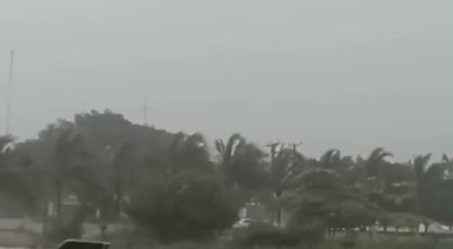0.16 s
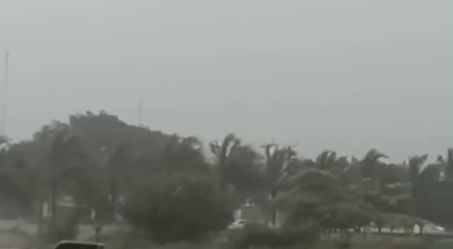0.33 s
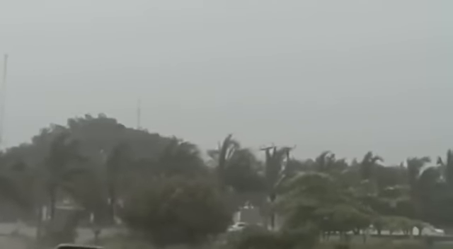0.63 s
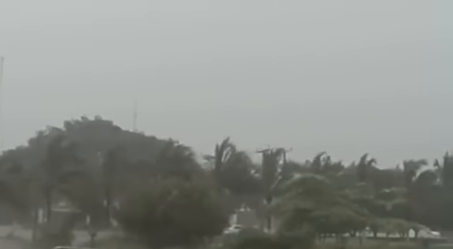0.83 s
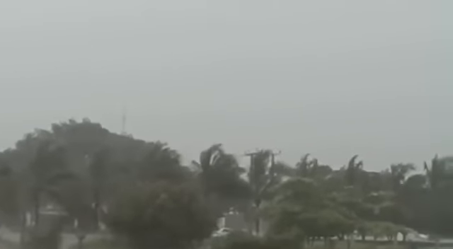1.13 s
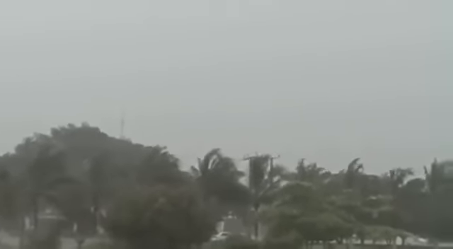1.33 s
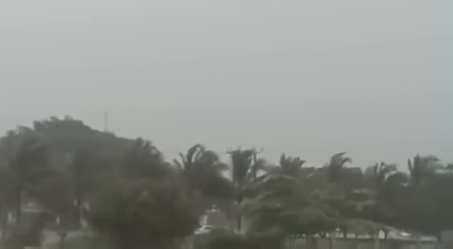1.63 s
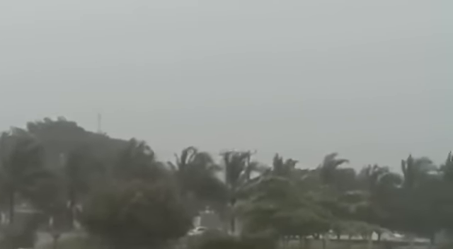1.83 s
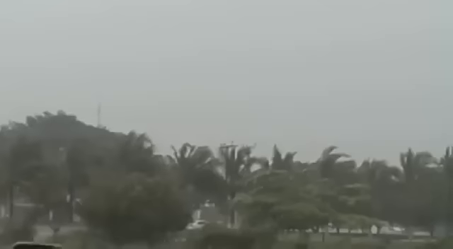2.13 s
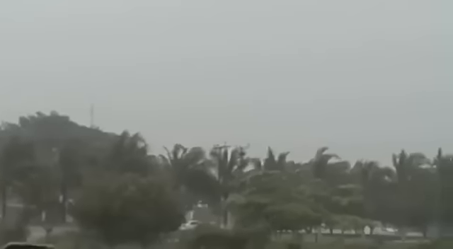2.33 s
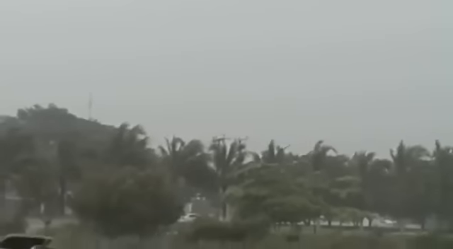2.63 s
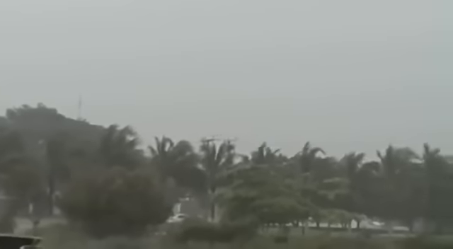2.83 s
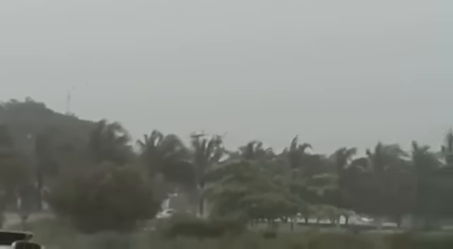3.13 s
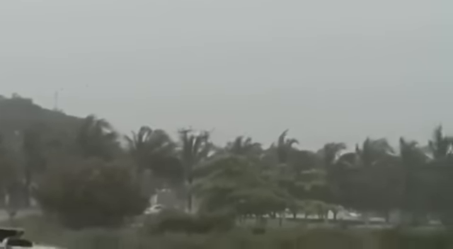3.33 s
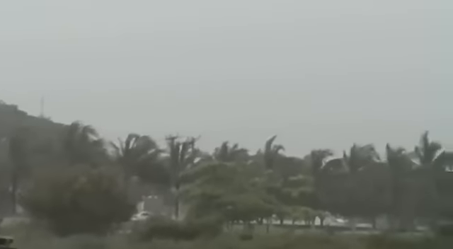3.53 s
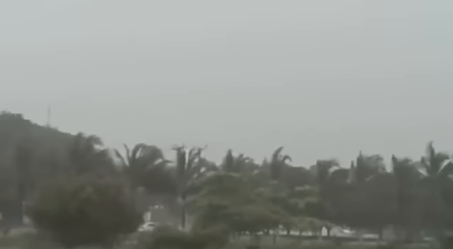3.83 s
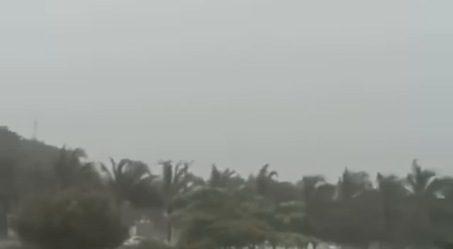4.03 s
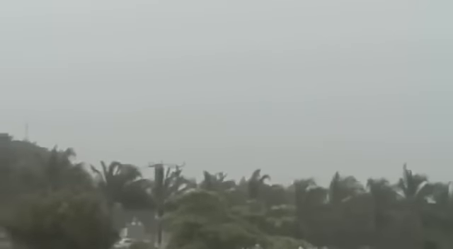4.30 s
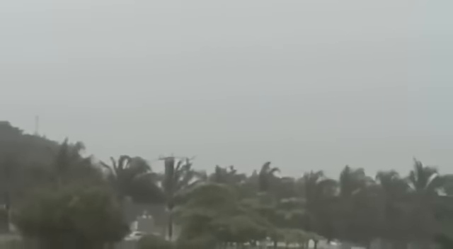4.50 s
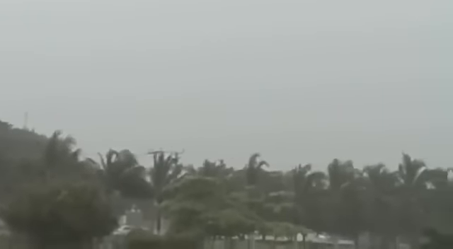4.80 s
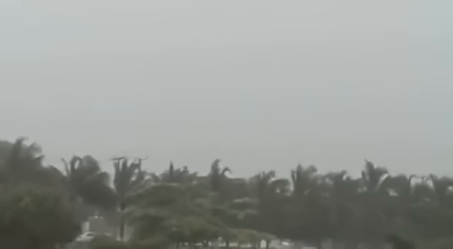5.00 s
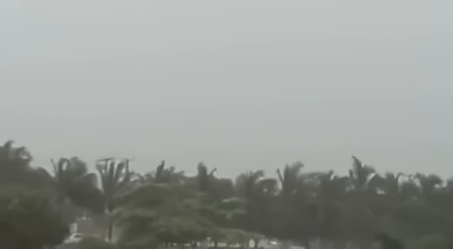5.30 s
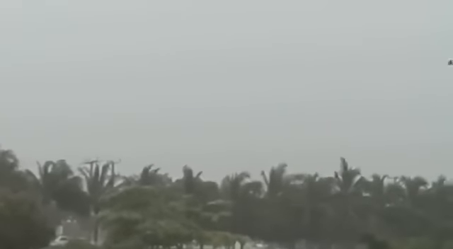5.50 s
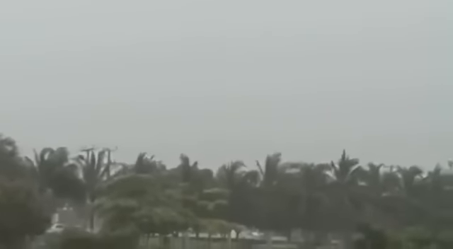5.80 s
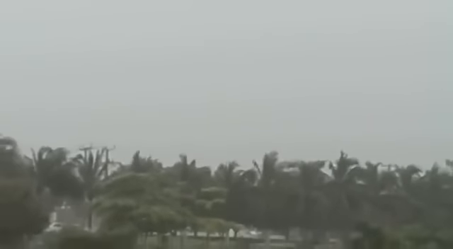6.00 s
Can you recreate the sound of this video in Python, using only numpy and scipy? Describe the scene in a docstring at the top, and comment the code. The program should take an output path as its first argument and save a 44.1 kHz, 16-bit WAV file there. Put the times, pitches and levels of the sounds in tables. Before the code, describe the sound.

Violent storm wind thumps and batters a hand-held microphone in uneven gusts, over the steady roar of thrashing palms and hissing heavy rain.

```python
"""Gusts of a hurricane buffet the two microphone ports of a hand-held camera: noise played louder and
faster as the pressure rises, with swings of pressure for thumps and slaps, and bursts of torn flow.
Behind them a line of palms roars and rain hisses: noise shaped in time and frequency at each port.
Tiny ticks make the nearer drops, one band of noise a flick of spray; the loudest peaks round off."""
import sys
import numpy as np
from scipy import signal
from scipy.fft import rfft, irfft
from scipy.io import wavfile
from scipy.ndimage import uniform_filter1d

SR = 44100
rng = np.random.default_rng(int(sys.argv[2]) if len(sys.argv) > 2 else 0)


def inscribe(sig):
    """Save sig as 16-bit PCM at rate SR to the path in sys.argv[1].

    A 1-D sig is mono; a 2-D sig holds one channel per row.
    Samples are clipped to [-1, 1] before scaling.
    """
    pcm = np.round(np.clip(np.atleast_2d(sig).T, -1, 1) * 32767)
    wavfile.write(sys.argv[1], SR, pcm.astype(np.int16))


N = 271215
TIME_S = np.arange(N) / SR
HZ = np.fft.rfftfreq(N, 1 / SR)

# roar of the trees, used about its mean: (time [s], level [dB])
ROAR = [(0.0, -26.5), (0.52, -24), (0.84, -26), (1.26, -24), (2.6, -25.5), (2.95, -27.5), (3.25, -25.5),
        (3.48, -25), (3.86, -23.5), (4.4, -26), (4.7, -24), (5.14, -24), (5.58, -26.5), (6.15, -24.5)]
# slow swell of the rain: (time [s], level [dB])
HISS = [(0.0, -28), (0.22, -25.5), (0.62, -25), (0.9, -27.5), (1.1, -26), (2.05, -26.5), (2.25, -27.4),
        (2.65, -26.5), (3.12, -27.5), (3.55, -26), (4.0, -24.8), (4.62, -25), (4.9, -24), (5.3, -24),
        (5.42, -25), (5.7, -26.8), (5.9, -26.5), (6.15, -25.5)]
# sheets of rain that swell out of the hiss: (time [s], rise [dB])
SHEETS = [(1.05, 0.5), (1.33, 2), (1.63, 2), (1.83, 1.5), (2.06, 1.5), (2.68, 0), (3.89, 3), (4.19, 0),
          (4.72, 1.5), (4.88, 1), (5.04, 1), (5.22, 0)]
# colour of trees and rain at each port: (frequency [Hz], relative density [dB])
LEFT_WASH = [(100, -6), (350, -17), (600, -8.5), (1170, -2), (1290, -5), (1830, -0.8), (2070, -1.7),
             (2510, -9.5), (3340, -6), (3680, -10.5), (5380, -5.5), (6730, -14), (6940, -17), (8950, -26),
             (10170, -24.5), (10840, -27.5), (14200, -33)]
RIGHT_WASH = [(100, -17), (350, -5), (600, -6), (1170, -2.5), (1330, -4), (1660, -4), (1950, -1.4),
              (2510, -9.5), (3450, -10.5), (3920, -11.5), (4310, -14.5), (5050, -13.5), (6110, -12),
              (6940, -14), (8950, -8), (9850, -8), (14200, -23)]
# narrow resonances of both ports: (frequency [Hz], width [Hz], rise [dB])
PORT_RINGS = [(1170, 57, 0.2), (3400, 160, 1.6), (4280, 63, 4)]
# likeness of the wash at the two ports: (frequency [Hz], correlation [-1..1])
LIKENESS = [(360, -0.8), (500, 0.06), (680, -0.26), (900, 0.29), (1400, 0.34), (1900, 0.08), (2500, -0.23),
            (3300, 0.18), (4500, -0.013)]
# strength of the wind around the camera: (time [s], level before trims [dB])
WIND = [(0.0, -23), (0.28, -29), (0.44, -20), (0.95, -21.5), (1.42, -31), (1.55, -21), (1.66, -23),
        (1.86, -21), (2.35, -30), (2.7, -26.5), (3.08, -25), (3.22, -19.5), (3.46, -24), (3.66, -20.5),
        (4.95, -19.5), (5.07, -24), (5.58, -19.5), (5.66, -31), (5.98, -38), (6.15, -27)]
# heaving air: (frequency [Hz], relative density [dB])
HEAVE_SPECTRUM = [(1, -20), (4, 4), (35, 1.5), (60, -5), (110, -25), (400, -50), (2000, -100)]
# small eddies in a moderate gust: (frequency [Hz], relative density [dB])
EDDY_SPECTRUM = [(15, -17), (55, -6.5), (105, 0), (240, -7), (440, -14), (800, -28), (1800, -47),
                 (6000, -85)]
# gusts that strike the ports: (start [s], length [s], windward pressure [dB], left-right [dB])
GUSTS = [(0.369, 0.07, -21, 0), (0.682, 0.18, -18.5, -2), (0.92, 0.025, -17, -1), (1.116, 0.037, -21, -2),
         (1.252, 0.055, -12, 10), (1.319, 0.17, -14.5, 9), (1.401, 0.04, -10, 12),
         (1.575, 0.017, -12.5, 14), (1.679, 0.03, -19, -9), (1.912, 0.023, -19, -8),
         (1.968, 0.018, -17, 10), (2.068, 0.022, -19, -7), (2.809, 0.046, -23, 2), (3.161, 0.034, -8.5, 18),
         (3.216, 0.16, -12.5, 12), (3.402, 0.054, -17, 8), (3.508, 0.021, -12, -15), (3.551, 0.089, -19, 2),
         (3.656, 0.2, -13.5, 12), (3.679, 0.0201, -5, 14), (3.73, 0.035, -9, 13.5), (3.829, 0.023, -10, 13),
         (3.924, 0.082, -15.5, 7.5), (4.06, 0.048, -17, 9), (4.216, 0.045, -12.5, 12.5),
         (4.276, 0.022, -8.5, 15), (4.324, 0.044, -20, 2), (4.415, 0.06, -11, 15), (4.58, 0.17, -19, -2),
         (4.82, 0.077, -17.5, 3), (4.94, 0.05, -15.5, 9), (5.165, 0.039, -18, 4.5),
         (5.434, 0.051, -18.5, 5), (5.518, 0.085, -19.5, 1), (6.094, 0.029, -19, 5.5)]
# large eddies landing as round thumps: (centre [s], peak before trim [dB], pitch [Hz])
THUMPS = [(0.413, -16, 79), (0.474, -12, 68), (0.735, -16, 78), (0.844, -11, 93), (0.942, -15.5, 95),
          (1.258, -11, 96), (1.304, -8, 130), (1.434, -6, 135), (1.548, -4.5, 54), (1.721, -15, 66.1),
          (1.883, -9, 104.4), (1.978, -10, 115), (2.08, -11, 120.2), (2.455, -17, 130), (3.168, -11, 118),
          (3.25, -2.5, 81), (3.35, -0.5, 103), (3.529, -11, 80.66), (3.59, -7, 92.86), (3.656, -7, 95),
          (3.732, 1, 126), (3.834, -10, 123), (3.93, -8, 82.7), (3.983, -11, 98), (4.019, -12, 90.66),
          (4.11, -11, 71), (4.213, -7, 81.13), (4.34, -7, 95.1), (4.412, -6, 82.93), (4.469, -6.5, 96.2),
          (4.699, -12, 68.02), (4.961, -5.5, 62), (5.173, -5.5, 97.35), (5.203, -18, 95.7),
          (5.386, -10, 66), (5.528, -8, 87.1), (5.587, -10.5, 82.73)]
# sharp eddies that slap a port: (time [s], peak before trim [dB], left-right [dB], only its sign is used)
SLAPS = [(0.692, -11, -1), (0.843, -23, -2), (0.94, -22, -2), (1.3, -17, 4), (1.437, -12, 5.0),
         (1.489, -21, 4), (2.455, -20, -1.0), (3.159, -16, 3), (3.221, -12, 7), (3.281, -9.5, 5.5),
         (3.295, -15, 4.5), (3.361, -9, 5.5), (3.58, -19, 3.0), (3.656, -8, 3.0), (3.728, -6, 6.0),
         (4.21, -17, 5.0), (4.289, -23, 3.5), (4.406, -11.5, 9), (4.464, -13, 4.0), (4.651, -10.5, -9),
         (5.172, -25, 2), (5.579, -14, 4.0)]
# torn flow on the left port: (centre [s], half length [s], level [dB], upper edge [Hz])
TEARS = [(0.936, 0.0073, -21, 450), (1.285, 0.025, -20, 420), (1.433, 0.022, -17, 524),
         (1.588, 0.0054, -15, 500), (3.188, 0.006, -23, 1600), (3.226, 0.0062, -18, 1400),
         (3.295, 0.02, -23, 900), (3.68, 0.025, -24, 1100), (3.749, 0.013, -10.3, 1600),
         (3.84, 0.028, -21, 1000), (4.284, 0.012, -12.5, 480), (4.43, 0.008, -18, 1198),
         (4.46, 0.016, -14, 540)]

WASH_DB, MODERATE_DB, EDGE_HZ = -22, -20, 14330
GUST_RISE_S, GUST_FALL_S, SHEET_S = 0.01208, 0.013, 0.019
# eddies between gusts: level in a moderate wind, gain in dB per dB of wind
BREEZE_DB, BREEZE_FOLLOW = -25.8, 0.31


def gain_of(db):
    """Decibels to an amplitude factor."""
    return 10 ** (np.asarray(db) / 20)


def evened(x):
    """Scales to rms 1."""
    return x / np.sqrt(np.mean(x ** 2) + 1e-20)


def steadied(x, size_samples):
    """Holds the running rms near 1."""
    return x / np.sqrt(uniform_filter1d(x ** 2, size_samples, mode="wrap"))


def read(points, hz):
    """Interpolates a spectrum on a log-frequency axis."""
    f, value = np.transpose(points)
    return np.interp(np.log(hz + 1), np.log(f + 1), value)


def follow(rows, t_s):
    """Interpolates a curve in time."""
    return np.interp(t_s, *np.transpose(rows))


def coloured(gain):
    """Noise of rms 1 with the given gain at each frequency."""
    return evened(irfft(rfft(rng.standard_normal(N)) * gain, N))


def flutter(hz):
    """Random wavering of rms 1, up to about the given rate."""
    return coloured(1 / (1 + (HZ / hz) ** 4))


def patches(shape, frames, bins):
    """Random blotches of rms 1 over time and frequency."""
    noise = rng.standard_normal(shape)
    noise = uniform_filter1d(noise, frames, axis=1)
    return evened(uniform_filter1d(noise, bins, axis=2))


def add(mix, start_s, sound):
    """Mixes a two-port sound in from start_s, cut at the end of the mix."""
    part = mix[:, max(round(start_s * SR), 0):][:, :sound.shape[-1]]
    part += sound[:, :part.shape[-1]]


def rainfall(t_s):
    """Rain level in dB: slow swell plus each passing sheet."""
    sheets = sum(db * np.exp(-((t_s - s) / SHEET_S) ** 2) for s, db in SHEETS)
    return follow(HISS, t_s) + sheets


def wash(moan_db=2.5, patch_db=1.0, sheet_db=0.56, sheet_hz=16):
    """Thrashing trees with fleeting moans below; rain in sheets and patches above."""
    hz = np.fft.rfftfreq(1024, 1 / SR)
    t_s = np.arange(N // 256 + 5) * 256 / SR
    a, b, c, d = rng.standard_normal((4, len(t_s), len(hz)))
    same = np.clip(read(LIKENESS, hz), -1, 1)
    left = a + 1j * b
    right = same * left + np.sqrt(1 - same ** 2) * (c + 1j * d)
    z = np.array([left, right])

    roar_db, hiss_db = follow(ROAR, t_s), rainfall(t_s)
    sheets_db = sheet_db * np.interp(t_s, TIME_S, flutter(sheet_hz))
    moans = patches(z.shape, 22, 2)  # long and narrow in pitch
    showers = patches(z.shape, 12, 14)  # shorter and broader
    trees_db = (roar_db - roar_db.mean())[:, None] + moan_db * moans
    rain_db = (hiss_db - hiss_db.mean() + sheets_db)[:, None] + patch_db * showers

    rain_share = read([(2000, 0.0084), (3600, 0.99)], hz)
    colour_db = np.array([read(LEFT_WASH, hz), read(RIGHT_WASH, hz)])[:, None]
    colour_db = colour_db + sum(db * np.exp(-((hz - f) / width) ** 2) for f, width, db in PORT_RINGS)
    z *= gain_of(colour_db + (1 - rain_share) * trees_db + rain_share * rain_db)
    sound = signal.istft(z.swapaxes(1, 2), nperseg=1024, noverlap=768)[1][:, :N]
    return gain_of(WASH_DB) * evened(sound)


def drops(per_s=500, spread_db=4.0, below_rain_db=-13, low_hz=2200, splash_s=0.00097):
    """Nearer drops burst as decaying noise ticks, independent at each port."""
    t_s, ports = np.arange(300) / SR, []
    for colour in (LEFT_WASH, RIGHT_WASH):
        strength_db = spread_db * np.minimum(rng.exponential(1, N), 4.5)
        hits = (rng.random(N) < per_s / SR) * gain_of(strength_db)
        envelope = signal.oaconvolve(hits, np.exp(-t_s / splash_s))[:N]
        ticks = envelope * rng.standard_normal(N)
        high_pass = HZ ** 2 / (HZ ** 2 + low_hz ** 2)
        ports.append(irfft(rfft(ticks) * gain_of(read(colour, HZ)) * high_pass, N))
    return evened(np.array(ports)) * gain_of(rainfall(TIME_S) + below_rain_db)


def spray(start_s=4.308, rise_s=0.009, hz=5100, width_hz=420, db=-24.0):
    """One swish of band noise, mostly left, like a flick of spray close by."""
    u = np.maximum(TIME_S - start_s, 0) / rise_s
    fizz = coloured(np.exp(-((HZ - hz) / width_hz) ** 2 / 2))
    return np.outer([1, .2], gain_of(db) * u * np.exp(1 - u) * fizz)


def heave(trim_db=-0.5, lurch_db=1.5, lurch_hz=7, size_samples=8000):
    """Air heaves around the whole camera: low rumble in uneven lurches, alike at both ports."""
    rumble = steadied(coloured(gain_of(read(HEAVE_SPECTRUM, HZ))), size_samples)
    return rumble * gain_of(follow(WIND, TIME_S) + trim_db + lurch_db * flutter(lurch_hz))


def tears(flap_db=2.5, flap_hz=170, low_hz=330, size_samples=900):
    """Flow breaks away from the left port in a broad, quickly flapping roar."""
    flaps, left = gain_of(flap_db * flutter(flap_hz)), np.zeros(N)
    for s, half_s, db, top_hz in TEARS:
        band = HZ ** 3 / (HZ ** 3 + low_hz ** 3) / (1 + (HZ / top_hz) ** 5)
        roar = steadied(coloured(band) * flaps, size_samples)
        left += roar * gain_of(db) * np.exp(-((TIME_S - s) / half_s) ** 2 / 2)
    return np.outer([1, 0], left)


def slaps(trim_db=2, core_s=0.00053, swirl=0.67, swirl_s=0.0071, swirl_hz=900):
    """A tight vortex crosses a port: one swing of pressure and a brief ragged wake."""
    ports, t_s = np.zeros((2, N)), np.arange(1500) / SR
    u = t_s / core_s - 4  # the core passes 4 core times in
    swing = u * np.exp((1 - u ** 2) / 2)
    band = signal.butter(2, [swirl_hz / 3, swirl_hz], "band", fs=SR, output="sos")
    for s, db, pan in SLAPS:
        wake = evened(signal.sosfilt(band, rng.standard_normal(len(t_s)))) * np.exp(-t_s / swirl_s)
        add(ports, s, np.outer([pan > 0, pan <= 0], gain_of(db + trim_db) * (swing + swirl * wake)))
    return ports


def thump(db, hz, turn, cycles=0.66):
    """One large eddy: pressure swings to and fro once or twice, centred in the result."""
    u = np.arange(-2500, 2500) / SR * hz
    return gain_of(db) * np.exp(-(u / cycles) ** 2) * np.cos(2 * np.pi * (u + turn))


def thumps(trim_db=-1.8, puffs_per_s=11, puff_db=-19.0, puff_follow=0.56, puff_spread_db=1.5,
           puff_hz=115):
    """Big eddies land on the left port; small puffs hit either port at random."""
    ports = np.zeros((2, N))
    for (s, db, hz), turn in zip(THUMPS, rng.random(len(THUMPS))):
        sound = thump(db + trim_db, hz, turn)
        add(ports, s - len(sound) / 2 / SR, np.outer([1, 0], sound))
    for k, (when, strength, pitch, turn, side) in enumerate(rng.random((100, 5))):
        s = (k + when) / puffs_per_s
        wind_db = puff_follow * (follow(WIND, s) - MODERATE_DB)
        db = puff_db + wind_db + puff_spread_db * (2 * strength - 1)
        sound = thump(db, puff_hz * 2 ** (pitch - .5), turn)
        add(ports, s - len(sound) / 2 / SR, np.outer([side < .5, side >= .5], sound))
    return ports


def pressure(side, breeze_db=0.0, restless_db=2.0, restless_hz=20):
    """dB on one port (side +1 left, -1 right): restless breeze, and gusts that rise, hold and die."""
    breeze = BREEZE_DB + breeze_db + BREEZE_FOLLOW * (follow(WIND, TIME_S) - MODERATE_DB)
    push = gain_of(breeze + restless_db * flutter(restless_hz))
    for start_s, length_s, db, pan_db in GUSTS:
        rise = np.clip((TIME_S - start_s) / GUST_RISE_S + .5, 0, 1)
        fall = np.exp(-np.clip((TIME_S - start_s - length_s) / GUST_FALL_S, 0, 20))
        lee_db = min(side * pan_db, 0)
        push = np.maximum(push, gain_of(db + lee_db) * rise * fall)
    return 20 * np.log10(push)


def buffet(gust_db, trim_db, large_hz=105, large_db=-8, stir_db=1.56, doubling_db=20,
           size_samples=1900):
    """Large eddies thump on a port and carry small ones past, louder and faster with pressure."""
    large = steadied(coloured(HZ / (1 + (HZ / large_hz) ** 4)), size_samples)
    small = steadied(coloured(gain_of(read(EDDY_SPECTRUM, HZ))), size_samples)
    stir = (large + flutter(large_hz / 2)) / np.sqrt(2)
    push_db = gust_db + stir_db * (stir - uniform_filter1d(stir, size_samples))
    speed = 2 ** ((push_db - MODERATE_DB) / doubling_db)
    swept = np.interp(np.cumsum(speed) % N, np.arange(N), small)  # noise read at that speed
    return gain_of(push_db + trim_db) * swept + gain_of(gust_db + large_db) * large


def wind(leak_s=0.00055, leak_hz=370, leak_db=-1.03):
    """Each port's buffeting also reaches the other channel, late and dull; the heave is common."""
    left = buffet(pressure(1, breeze_db=-0.14), trim_db=0.38, large_db=-11.5)
    right = buffet(pressure(-1), trim_db=1.0, large_db=-13.5)
    ports = np.array([left, right]) + slaps() + thumps() + tears()
    delay = np.exp(-2j * np.pi * HZ * leak_s)
    leak = gain_of(leak_db) * delay / (1 + 1j * HZ / leak_hz)
    return ports + irfft(rfft(ports[::-1]) * leak, N) + heave()


def scene():
    """Storm roar, rain and spray under the wind on the ports."""
    return wash() + drops() + spray() + wind()


def record(dry, ceiling=0.83):
    """Peaks round off against the microphone's ceiling; then a low-pass sets the band limit."""
    squashed = dry / (1 + (dry / ceiling) ** 4) ** (1 / 4)
    low_pass = signal.firwin(1023, EDGE_HZ, window=("kaiser", 9), fs=SR)
    return signal.oaconvolve(squashed, low_pass[None], "same", axes=1)


dry = scene()
out = record(dry)
inscribe(out)
```